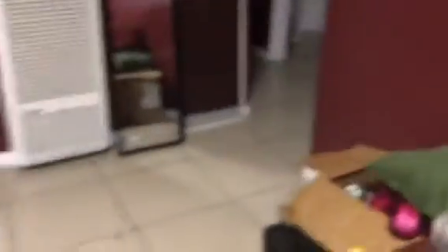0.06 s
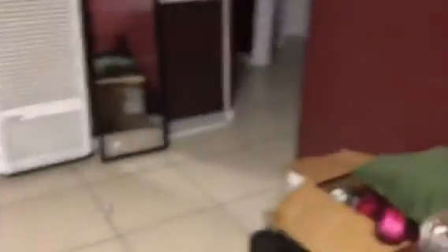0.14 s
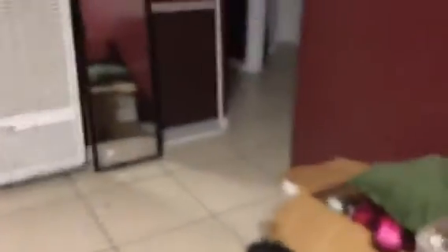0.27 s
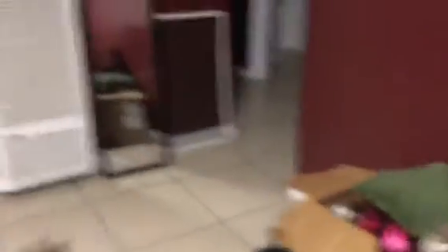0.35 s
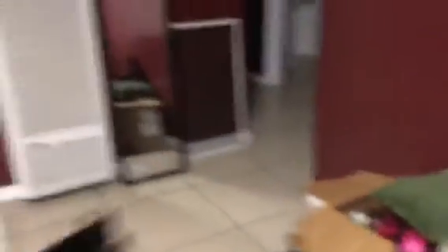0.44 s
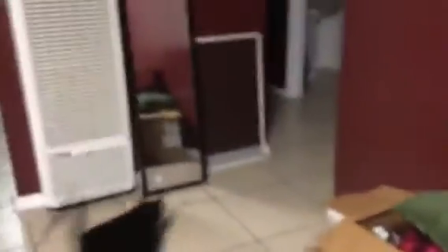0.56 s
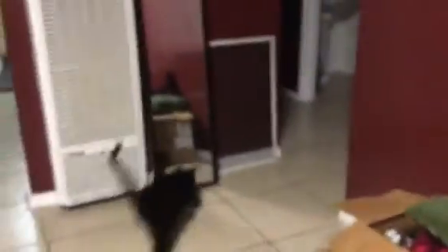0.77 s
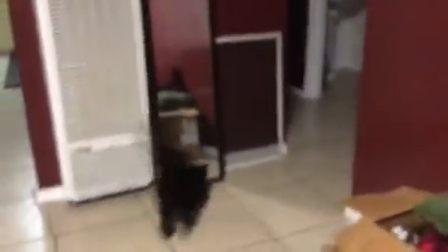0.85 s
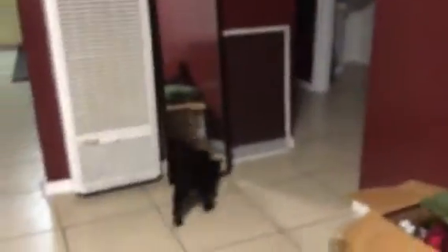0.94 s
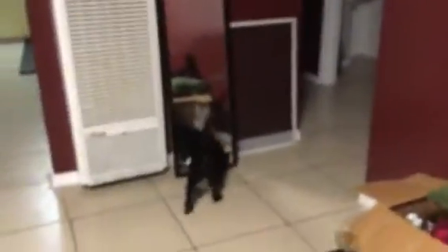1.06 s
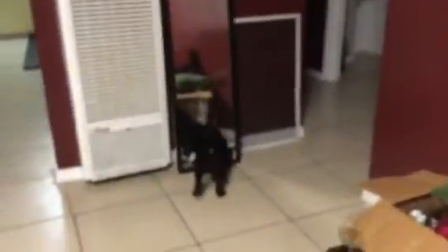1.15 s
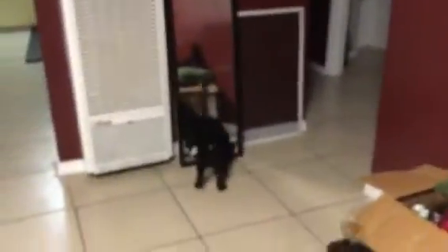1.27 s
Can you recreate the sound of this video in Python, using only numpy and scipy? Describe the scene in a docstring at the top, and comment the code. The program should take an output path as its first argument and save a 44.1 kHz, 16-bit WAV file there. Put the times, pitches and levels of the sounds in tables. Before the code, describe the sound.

A bottle cap clinks and skitters across a tiled floor in a quiet room.

```python
"""In a quiet room, a bottle cap skitters across the tiled floor and a cat runs after it on soft paws.
The cap lands four times in quick clusters of touches, each a tick on the tile that sets the cap ringing.
It rocks on its rim in between, knocks against the wall's wooden trim and slides to rest with a hiss.
The walls ring after each clink; the microphone takes one soft bump over a faint low hum."""
import sys
import numpy as np
from scipy import signal
from scipy.fft import rfft, irfft
from scipy.io import wavfile

SR = 44100
rng = np.random.default_rng(int(sys.argv[2]) if len(sys.argv) > 2 else 0)


def bounce(signal):
    """Save signal as a 16-bit WAV file at the path given by the first command-line argument."""
    frames = np.transpose(np.atleast_2d(signal))
    limited = np.clip(frames, -1, 1)
    pcm = np.round(limited * 32767).astype(np.int16)
    wavfile.write(sys.argv[1], SR, pcm)


N = 57330

# The cap's own tones. Each row: pitch in Hz, relative level in dB, ring time in seconds.
# A ring time (T60) is how long a sound takes to fade by 60 dB.
CAP_TONES = [(2784, 0, 0.021), (2966, -15.5, 0.038), (3450, 0, 0.0023), (4005, -7.5, 0.0033),
             (4991, -12, 0.022), (5855, -0.5, 0.0062), (8770, -0.5, 0.0061), (9110, -5, 0.014),
             (9770, -10.5, 0.013), (11070, 3, 0.0053), (12040, 0, 0.008), (13420, -1, 0.016),
             (13100, -31.5, 0.03), (14370, 2.5, 0.01)]
# Six pitches in Hz at which a touch says how hard it drives the cap's tones.
DRIVE_HZ = (2800, 3500, 5500, 9100, 9900, 13800)
# The cap's landings. Each row: start in seconds, tick level in dB, then a drive in dB for each DRIVE_HZ.
TOUCHES = [ (.2152, -21.5, -43.5, -22.5, -29, -40, -32, -31.5), (.2188, -22, -44, -78, -66, -33, -21, -37),
           (.2224, -66, -30.5, -52, -55, -50, -38.5, -29.5),
           (.2380, -36.5, -40.5, -65, -76, -28.5, -45.5, -31), (.2430, -53.5, -24, -41, -60, -38, -56, -30),
           (.4292, -26.5, -48, -87, -64, -36, -49, -45), (.4313, -39, -34, -40.5, -44.5, -30, -47.5, -50.5),
           (.4362, -58, -74, -48, -58.5, -39, -62.5, -62), (.5020, -38, -42, -48, -53, -48, -54, -48),
           (.5480, -14, -25, -31, -45, -37.5, -34.5, -44), (.5526, -27, -65, -36, -79, -39, -33.5, -36),
           (.5640, -48, -83, -48.5, -68, -34, -48, -38), (.5700, -49, -75, -83, -29, -40, -58, -65),
           (.5778, -45, -64, -46, -50, -39, -54, -51), (.8360, -64, -55, -74, -74, -68, -70, -70),
           (.8947, -43, -42, -52, -50, -44, -47, -44), (.9003, -53, -72, -80, -46.5, -34.5, -68, -47),
           (.9057, -41, -38, -28, -52, -48, -50, -47), (.9100, -48, -48, -67, -43.5, -46, -39, -44), ]
# The tick of rim on tile. Each row: frequency in Hz, boost or cut in dB.
TICK_SPECTRUM = [(80, -14), (250, -1), (550, -4), (850, -11.5), (1150, -6.5), (2000, 5.5), (3600, -0.5),
                 (4800, -1), (7000, 2), (11000, 3.5), (15000, -1)]
# The cap rocking. Each row: start and length in seconds, tick level in dB, drive in dB for the
# lowest tone, drive in dB for the tone near 9 kHz.
WOBBLES = [(0.437, 0.087, -66, -53.5, -87), (0.603, 0.062, -43, -52, -78), (0.752, 0.27, -83, -68, -93)]
# The hiss of the last slide. Each row: frequency in Hz, relative level in dB.
SLIDE_SPECTRUM = [(300, -23.5), (650, 3), (1400, -1.5), (2200, 1.5), (2800, -2), (4300, 1), (7000, -12),
                  (9000, -2), (12500, 4), (15000, -1)]
# The cap hitting the wooden trim. Each row: start in seconds, level in dB.
KNOCKS = [(.548, -17), (0.5548, -22), (.563, -18), (.571, -29), (.581, -19), (.9057, -33)]
# The sound of that wood. Each row: frequency in Hz, boost or cut in dB.
WOOD_SPECTRUM = [(50, -38.5), (170, -7), (280, 9), (420, 3), (750, -2), (1200, -1), (1800, 5), (2500, 9),
                 (4500, -21.5), (6500, 1.5), (15000, -23)]
# The cat's steps. Each row: start in seconds, level in dB, pitch in Hz.
PAW_STEPS = [(0.605, -42, 177.5), (0.612, -45.5, 312), (.745, -58.5, 137), (0.906, -49, 167)]
# Places the cap reaches. Each row: start in seconds, boost or cut of the room's answer in dB.
PLACES = [(0, -4.7), (.41, -1.5), (.535, -1.56), (.74, 1.5), (0.878, -2.5)]
# How long the room rings. Each row: frequency in Hz, ring time in seconds.
ROOM_RING_TIMES = [(250, 0.21), (1000, 0.42), (2800, 0.42), (6000, 0.46), (10000, 0.32), (14000, 0.31)]
# The noise of the still room. Each row: frequency in Hz, relative level in dB.
BACKGROUND_SPECTRUM = [(15, -57.5), (25, -22), (81, -11.5), (154, -10.5), (186, -5), (237, -10.5),
                       (383, -15.5), (438, -23), (1210, -27.5), (1390, -29.5), (1860, -32), (2500, -35.5),
                       (15000, -39)]


def cap(touches):
    """Each touch ticks on the tile and rings the cap's tones, slightly detuned by the way it sits."""
    hz, db, t60 = np.transpose(CAP_TONES)
    ringing, t = np.zeros(N), np.arange(SR // 10)[:, None] / SR
    decay = from_db(-60 * t / t60) * np.heaviside(t, .5)
    signs = (-1) ** np.arange(len(hz))
    for start, _, *drives in touches:
        scatter_db, detune = rng.standard_normal(size=(2, len(hz)))
        gains = signs * from_db(db + np.interp(hz, DRIVE_HZ, drives) + scatter_db)
        tones = decay * np.cos(2 * np.pi * hz * (1 + .005 * detune) * t)
        add(ringing, start, tones @ gains)
    starts, tick_db = np.transpose(touches)[:2]
    return ringing + blows(starts, tick_db, t60=.002, spectrum=TICK_SPECTRUM)


def wobble():
    """Rocking on its rim, the cap gives the tile many tiny touches at random moments."""
    touches_per_s, other_db = 330, -79.5
    touches, t = [], np.arange(N) / SR
    for start, length, tick_db, lowest_db, ping_db in WOBBLES:
        touching = (rng.random(N) < touches_per_s / SR) & (t > start) & (t < start + length)
        drives = (lowest_db, other_db, other_db, ping_db, other_db, other_db)
        touches += [(when, tick_db, *drives) for when in t[touching]]
    return cap(touches)


def slide():
    """The cap slides flat, and the rubbing makes a fine hiss that swells in and dies as it stops."""
    start_s, stop_s, fade_s = .85, 1.137, .047
    t = np.arange(N) / SR
    swell = np.clip(np.minimum(t - start_s, stop_s - t) / fade_s, 0, 1)
    grains = rng.standard_normal(N) ** 3  # cubing makes smooth noise spiky
    return from_db(-68.5) * swell * rms_one(colour(grains, SLIDE_SPECTRUM))


def trim_knocks():
    """The cap strikes the wall's wooden trim, which answers with short knocks."""
    starts, levels_db = np.transpose(KNOCKS)
    return blows(starts, levels_db, t60=.018, spectrum=WOOD_SPECTRUM)


def paws():
    """Each soft paw makes a dull thud on the floor: a low tone that starts gently and fades fast."""
    t60 = .058
    out, t = np.zeros(N), np.arange(SR // 4) / SR
    for start, db, hz in PAW_STEPS:
        onset = 1 - np.exp(-t * hz)
        add(out, start, from_db(db - 60 * t / t60) * onset * np.sin(2 * np.pi * hz * t))
    return out


def microphone_bump():
    """A bump on the microphone makes one soft thump whose pitch drops at once."""
    start_s, peak_s, fall_s = .4152, .0037, .00032
    start_hz, end_hz = 1124, 60
    t = np.maximum(np.arange(N) / SR - start_s, 0)
    hz = end_hz + (start_hz - end_hz) / (1 + t / fall_s)
    pulse = t / peak_s * np.exp(1 - t / peak_s)
    return from_db(-38) * pulse * np.sin(2 * np.pi * np.cumsum(hz) / SR)


def room_response():
    """The walls answer a click with six sharp echoes and a dense tail whose bass and top die first."""
    first_echo_s, spread_s, build_s = .0015, .028, .0016
    size = 2 ** 15
    t, hz = np.arange(size) / SR, np.arange(size // 2 + 1) * SR / size
    noise_spectrum, tail = rfft(rng.standard_normal(size)), np.zeros(size)
    edges_hz = np.r_[0, np.geomspace(200, SR / 2, 12)]
    for low, high in zip(edges_hz, edges_hz[1:]):
        band = irfft(noise_spectrum * (hz >= low) * (hz < high))
        tail += band * from_db(-60 * t / at_hz(ROOM_RING_TIMES, (low + high) / 2))
    tail *= 1 - np.exp(-np.maximum(t - first_echo_s, 0) / build_s)
    delays_s = first_echo_s + spread_s * rng.random(6) ** 2
    gains = from_db(-9.5) * rng.choice([-1, 1], size=6)
    echoes = np.bincount((delays_s * SR).astype(int), gains, size)  # one click for each echo
    return from_db(1.5) * tail / np.linalg.norm(tail) + echoes


def room(sound, responses):
    """The room answers differently from each place that the cap reaches."""
    starts, levels_db = np.transpose(PLACES)
    place = np.searchsorted(starts[1:], np.arange(N) / SR)
    out = np.zeros(N)
    for k, response in enumerate(responses):
        out += from_db(levels_db[k]) * signal.fftconvolve(sound * (place == k), response)[:N]
    return out


def background():
    """Low room noise, faint hiss and a hum whose loudness wavers."""
    noise_db, hum_db, hum_hz = -68.5, -74, 188
    t = np.arange(N) / SR
    waver = np.interp(t, np.linspace(0, N / SR, 24), rng.standard_normal(24))
    hum = np.sqrt(2) * (1 + .35 * waver) * np.sin(2 * np.pi * hum_hz * t)
    noise = rms_one(colour(rng.standard_normal(N), BACKGROUND_SPECTRUM))
    return from_db(noise_db) * noise + from_db(hum_db) * hum


def blows(starts, levels_db, t60, spectrum):
    """Each blow is a click plus a brief crunch of noise, coloured by what is struck."""
    out, t = np.zeros(N), np.arange(SR // 50) / SR
    click = t == 0
    for start, gain in zip(starts, from_db(levels_db)):
        crunch = rng.standard_normal(len(t)) * from_db(-60 * t / t60)
        add(out, start, gain * (click + crunch / np.linalg.norm(crunch)))
    return colour(out, spectrum)


def colour(sound, spectrum):
    """Boost or cut each frequency, with no ringing ahead of a hit (a minimum-phase filter)."""
    size = 2 * N
    hz = np.maximum(np.arange(N + 1) * SR / size, 1)
    cepstrum = irfft(np.log(from_db(at_hz(spectrum, hz))))
    fold = np.r_[1, np.full(N - 1, 2), 1, np.zeros(N - 1)]  # moves all ringing to after the hit
    response = np.exp(rfft(cepstrum * fold))
    return irfft(rfft(sound, size) * response)[:N]


def at_hz(table, hz):
    """Read between a table's rows, giving every octave the same width."""
    table_hz, values = np.transpose(table)
    return np.interp(np.log(hz), np.log(table_hz), values)


def from_db(db):
    """Turn decibels into a number to multiply by."""
    return 10 ** (np.asarray(db) / 20)


def rms_one(sound):
    """Scale a sound so that its average strength (rms) is one."""
    return sound / np.sqrt(np.mean(sound ** 2) + 1e-20)


def add(out, start_s, sound):
    """Mix a short sound in at the given time."""
    start = int(np.clip(start_s * SR, 0, N - 1))
    out[start:start + len(sound)] += sound[:N - start]


def scene():
    """The cap and the cat echo in the room; the bump and the background get no echo."""
    still_room = background()
    responses = [room_response() for _ in PLACES]
    floor_sounds = trim_knocks() + paws() + slide() + cap(TOUCHES) + wobble()
    return (floor_sounds + room(floor_sounds, responses) + microphone_bump() + still_room)[None]


def record(dry):
    """The very highest treble is cut off steeply."""
    cutoff_hz = 15300
    return signal.sosfilt(signal.ellip(12, .1, 80, cutoff_hz, fs=SR, output="sos"), dry)


dry = scene()
out = record(dry)
bounce(out)
```